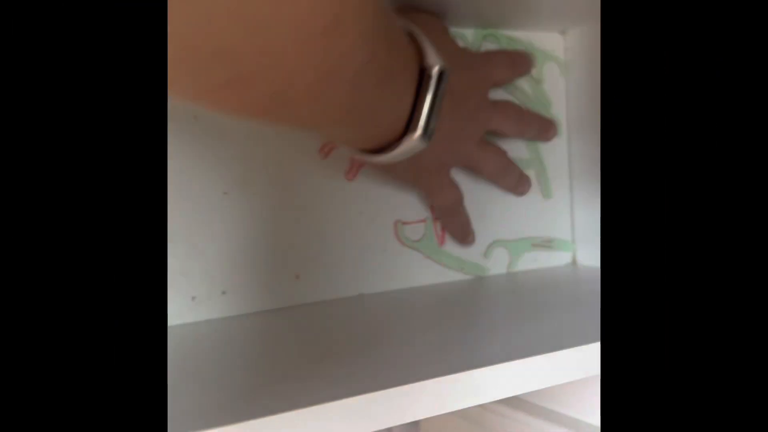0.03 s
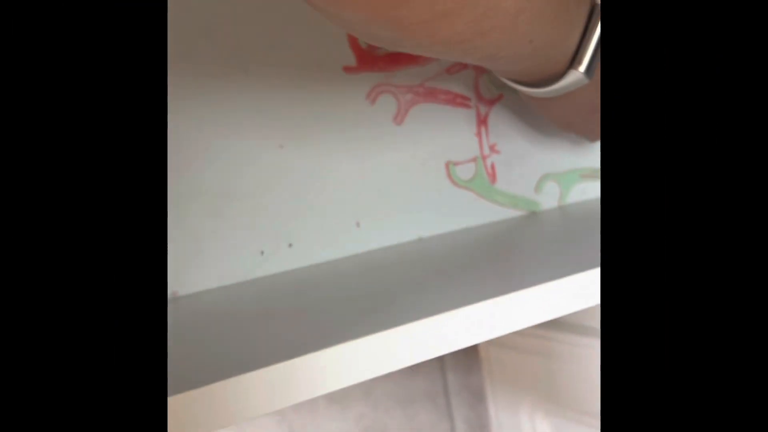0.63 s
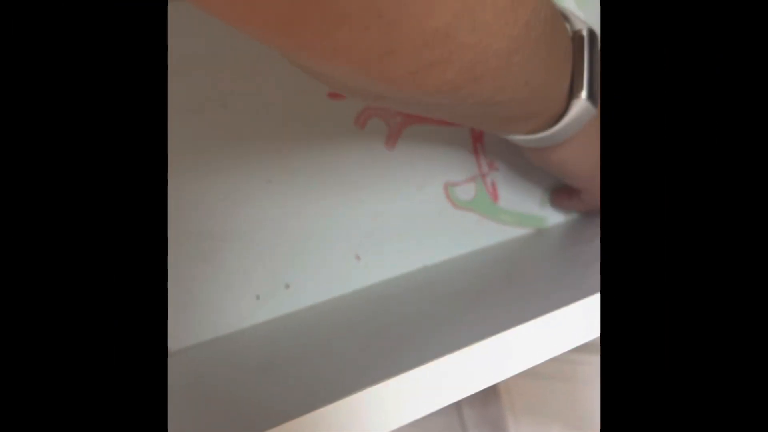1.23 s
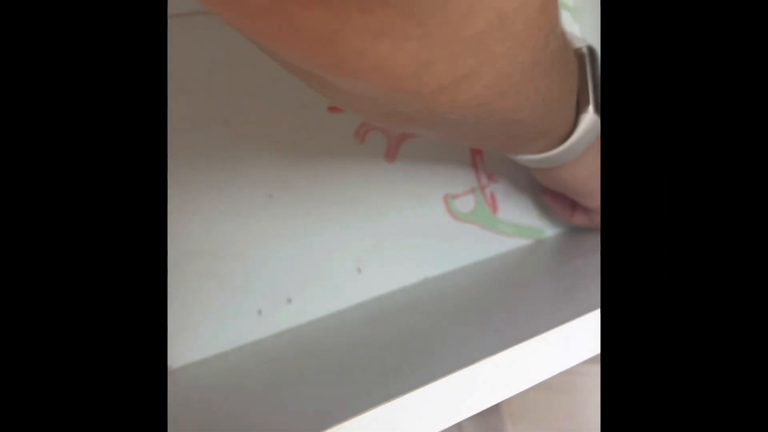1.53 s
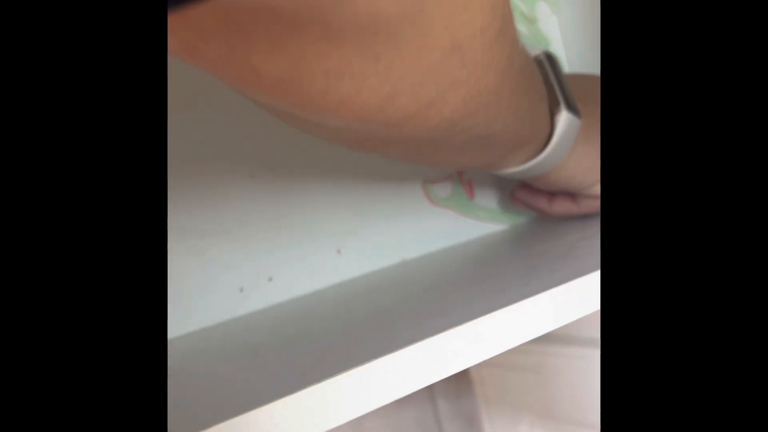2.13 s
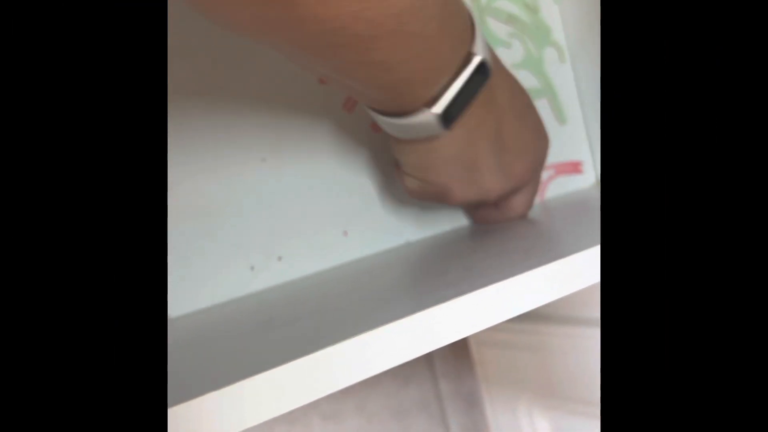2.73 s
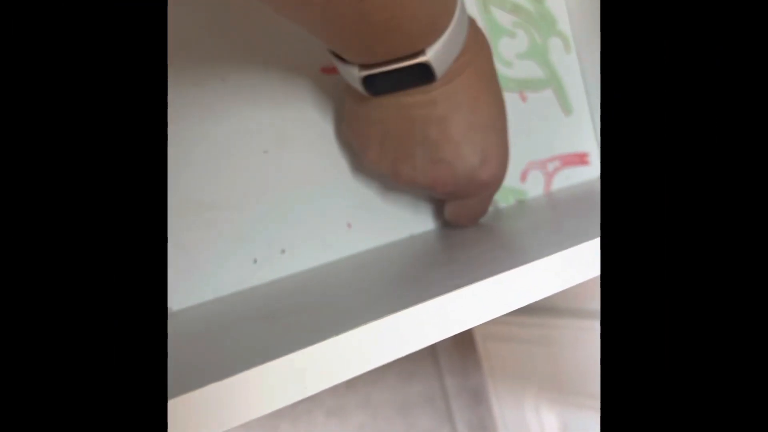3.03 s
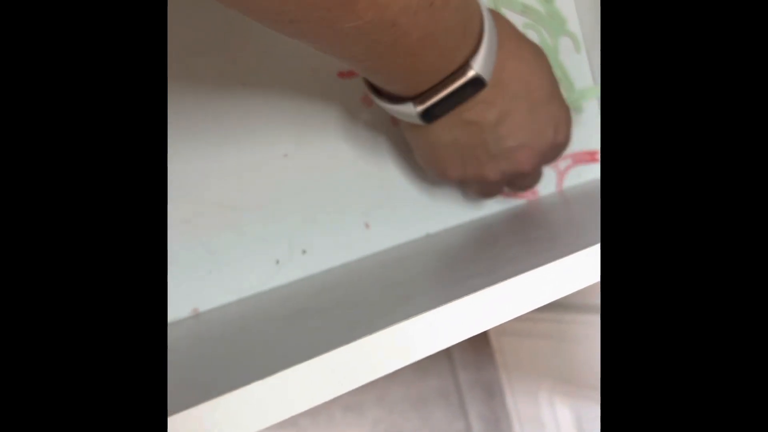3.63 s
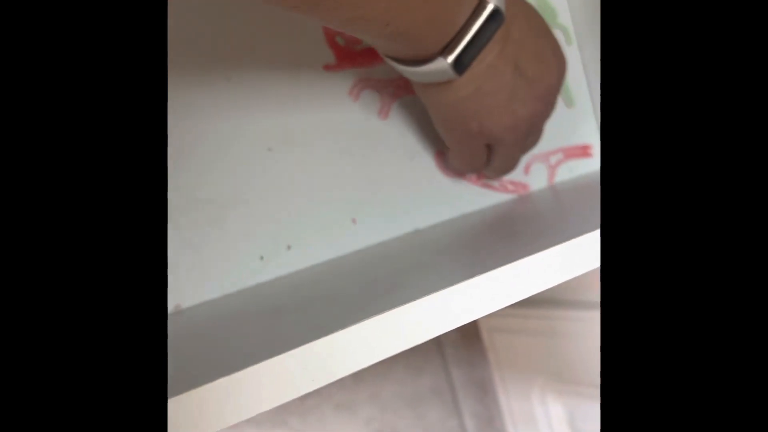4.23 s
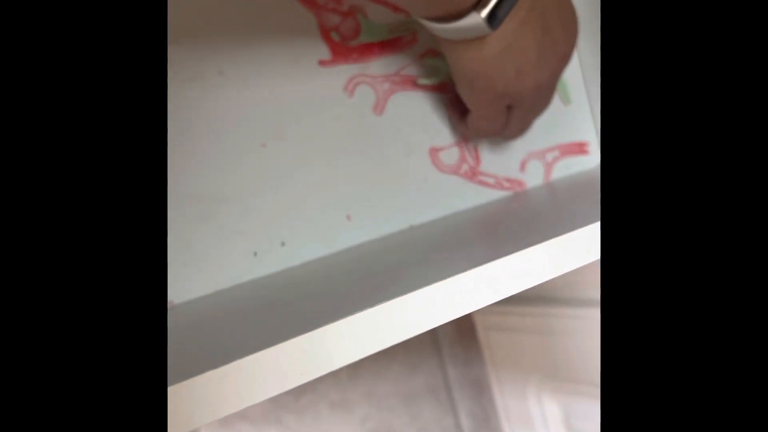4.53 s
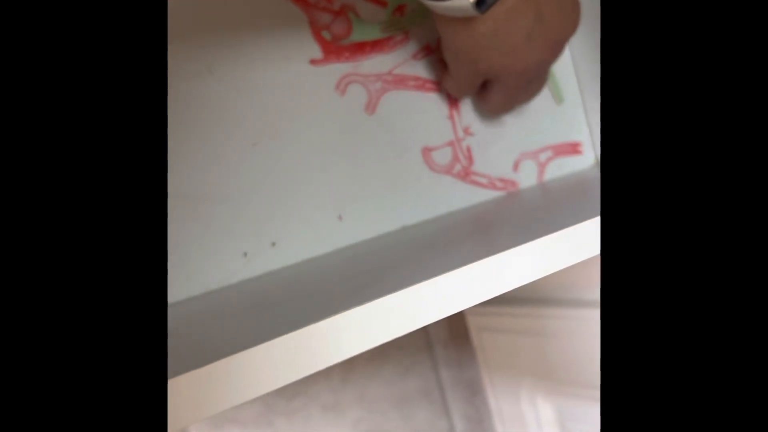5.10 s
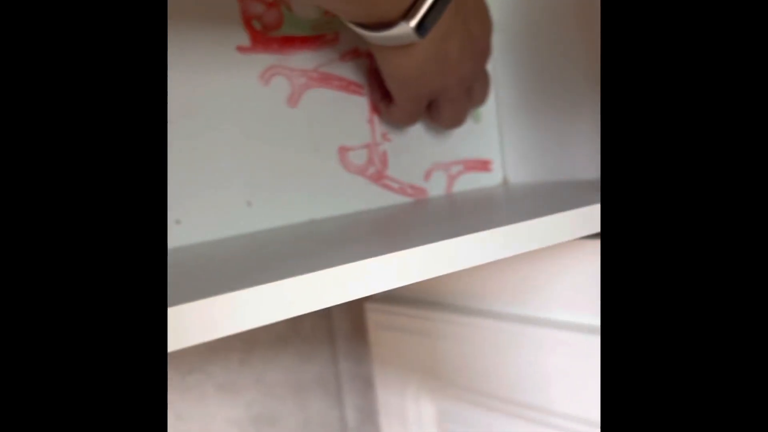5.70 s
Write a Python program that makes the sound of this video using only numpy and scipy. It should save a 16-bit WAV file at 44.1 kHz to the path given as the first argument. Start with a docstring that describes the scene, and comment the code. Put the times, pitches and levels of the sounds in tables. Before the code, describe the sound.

Close, irregular scraping and clattering of little plastic picks as a hand sweeps a cabinet shelf, knocking its hollow board.

```python
"""A hand rubs softly at small plastic picks spilled on a bathroom cabinet shelf, close to the microphone.
From about 1 s, nails and picks catch and snap harder, and knuckles bump the hollow shelf.
A heavy shove rocks the cabinet at 3.1 s, and at 3.4 s a dragging edge squeaks once.
The rubbing and clatter are busiest from 3.8 to 5.1 s, then thin out to a last bump near 5.9 s.
All along, the cabinet rings under the bumps and the tiled room adds a short echo."""
import sys
import numpy as np
from scipy import signal
from scipy.fft import rfft, irfft
from scipy.io import wavfile
from scipy.ndimage import uniform_filter1d

SR = 44100
rng = np.random.default_rng(int(sys.argv[2]) if len(sys.argv) > 2 else 0)


def output_pcm(signal):
    """Save a mono or channel-first signal as 16-bit PCM at the path in sys.argv[1].

    Samples are clipped to [-1, 1] before scaling.
    """
    pcm = np.clip(np.atleast_2d(signal).T, -1, 1) * 32767
    wavfile.write(sys.argv[1], SR, np.round(pcm).astype(np.int16))


N = 262836
T = np.arange(N) / SR

# Nails and picks snapping: start_s, level_db, hardness_db (low is dull, high is crisp), fade_s
SNAPS = [(0.215,-41.5,1,0.062), (0.5117,-35.5,-6.5,0.07), (0.802,-41.5,-7,0.048), (.964,-46.5,-18.5,0.14),
         (1.0057,-28.5,-9.5,0.052), (1.1228,-35.5,-6,0.047), (1.1322,-37,-1.5,0.12),
         (1.2043,-25.5,-5.5,0.042), (1.3627,-34,-6.5,0.058), (1.4277,-37,-6.5,0.054), (1.5456,-38,-8,0.15),
         (1.6564,-49.5,10.5,0.32), (1.694,-22,-1,0.05), (1.7666,-30.5,7,0.0084), (1.8068,-33,6.5,0.034),
         (1.8396,-30,9.5,0.045), (1.8599,-14.5,0.5,0.043), (2.142,-47.5,-16,0.12), (2.3047,-42,9,0.11),
         (2.4296,-12,6,.025), (2.44,-24,0.5,0.11), (2.9728,-33.5,-12,0.087), (3.097,-38.5,8.5,0.034),
         (3.1207,-15,7.5,0.076), (3.1278,-20,-0.5,0.038), (3.3003,-22,4.5,0.079), (3.345,-35.5,21,0.2),
         (3.368,-28,6,0.027), (3.4967,-29,17,0.022), (3.622,-46.5,10.5,0.024), (3.7547,-45.5,12,0.048),
         (3.7733,-38.5,-6,0.21), (3.8121,-11,2.5,0.013), (3.8182,-16,6.5,0.062), (3.8604,-25.5,7,0.061),
         (3.884,-29,10,0.035), (3.897,-24.5,1.5,0.054), (3.9083,-33,9,.07), (3.941,-21,6,0.099),
         (3.9952,-24,0,0.064), (4.0287,-17.5,-3.5,0.032), (4.207,-48.5,2,0.12), (4.2371,-35.5,13,0.032),
         (4.2554,-41.5,17,0.047), (4.3227,-18.5,0.5,0.038), (4.351,-12,2,0.06), (4.4354,-21,-11.5,0.064),
         (4.4545,-19,9,0.031), (4.5454,-31,-13.5,0.081), (4.6305,-25,3,0.063), (4.6726,-22.5,0,0.094),
         (4.683,-26.5,-10.5,0.025), (4.7235,-26,1.5,0.11), (4.799,-25,-1.5,0.05), (4.878,-16,-1,0.014),
         (4.8861,-12,0,0.026), (4.943,-25.5,-9.5,0.045), (4.9496,-31,6,0.095), (5.0408,-7.5,2.5,0.019),
         (5.0453,-11.5,-2.5,0.067), (5.3535,-44,-23,0.092), (5.686,-24,-2,0.04), (5.914,-33,3,0.069)]
# Bumps on the shelf: start_s, level_db, pitch_hz, knock_db, ring_db (the last two add to level_db)
BUMPS = [(0.22,-43,263,-7,11), (0.596,-46,255,-3,15.5), (1.011,-29,249,-25,8), (1.131,-28,258,-2.5,5),
         (1.207,-20,277,-3,7.5), (1.437,-32.5,275,-6,0), (1.548,-42,286,5,13), (1.698,-26.5,270,0,4),
         (1.75,-36,242,-17,13), (1.865,-16.5,264,-4.5,7), (2.416,-34.5,289,-9,13), (2.465,-18,260,-6,7),
         (2.589,-27.5,272,-24,-2), (2.876,-10.5,269.6,-14,-10), (2.976,-34,284,-7.5,21.5),
         (3.004,-18,250,-6,0.5), (3.127,-6.5,298.6,-22,0), (3.139,-7,265,-10,-5.5), (3.293,-26.5,312,-5,-4),
         (3.306,-25.5,250,-9,1), (3.638,-38.5,255,-12,6.5), (3.776,-24,309,-15.5,10),
         (3.789,-18,281,-8.5,11.5), (3.824,-20.5,261,-5,9), (4.031,-17,267,-5.5,-14),
         (4.328,-15,269,-20,-12.5), (4.358,-18,282,-8.5,5), (4.412,-19.5,263,-20,3),
         (4.444,-20.5,277,-13,-2), (4.458,-21,258,-21.5,-3), (4.55,-9,278.6,-5,2),
         (4.617,-19.5,264,-23.5,-3), (4.811,-17,257,-20.5,-4.5), (4.829,-10,262,-27.5,-1.5),
         (4.882,-14.5,268,-30,1.5), (5.015,-14,249,-12,-1), (5.055,-8,264,-15.5,-3.5),
         (5.103,-24,235,-9,-2), (5.521,-46,250.5,-21.5,13.5), (5.689,-33,286,-18,-1),
         (5.907,-16,263,-10.5,-28)]
# Shoves that rock the whole cabinet: start_s, level_db
SHOVES = [(1.21, -40), (1.866, -37.5), (2.878, -41), (3.136, -21), (3.163, -28), (4.357, -43),
          (4.443, -39.5), (4.552, -36.5), (5.052, -28)]
# Strokes of the hand: start_s, length_s, level_db, hardness_db (low is skin, high is nail or plastic)
STROKES = [(0,0.084,-48,4), (0.169,.09,-53.5,8.5), (0.419,.08,-51.5,4.5), (.51,0.11,-45.5,2),
           (.85,0.02,-52.5,-1.5), (1.01,0.053,-44,-2.5), (1.108,0.062,-44,-0.5), (1.22,0.052,-40.5,8.5),
           (1.318,0.056,-34,-1.5), (1.44,.17,-45,-2), (1.71,0.18,-65,28), (1.879,0.02,-29.5,-4),
           (1.98,0.098,-41,-0.5), (2.188,0.32,-45.5,4), (2.438,0.12,-33,1.5), (2.59,.13,-51,-8),
           (2.751,0.14,-43.5,-0.5), (2.91,.17,-40,-5), (3.1,0.056,-27,5), (3.269,0.15,-49.5,13.5),
           (3.409,0.053,-37.5,18), (3.519,0.21,-63,16.5), (3.84,0.14,-27,3.5), (3.98,0.14,-32,0.5),
           (4.2,0.046,-37,2), (4.361,0.16,-31.5,-4.5), (4.571,0.21,-28.5,-0.5), (4.811,0.087,-24,5.5),
           (4.972,.11,-22.5,3.5), (5.11,0.077,-41.5,1), (5.191,0.11,-41.5,-4.5), (5.32,0.096,-58.5,-12.5),
           (5.47,0.09,-47,-5), (5.71,0.12,-47,-2.5), (5.832,.13,-33,-1.5)]
# Rumble of the arm leaning on the cabinet: time_s, level_db
ARM_RUMBLE = [(0,-68.5), (.9,-74), (1.2,-49), (1.75,-60), (1.9,-52), (2.3,-65), (3.05,-48.5), (3.18,-41.5),
              (3.5,-67.5), (4,-56), (4.45,-49.5), (4.7,-57), (5.12,-40), (5.4,-73), (5.96,-62)]
# Short scrapes: middle_s, half_length_s, level_db, brightest_hz
SCRAPES = [(0.024,0.05,-65,1690), (0.259,0.018,-50,1510), (0.588,0.015,-59,1180), (1.259,0.0061,-48,2900),
           (1.698,0.0092,-31,8700), (2.068,0.023,-48.5,3080), (2.432,0.0039,-25,3100),
           (2.446,0.0076,-30,2980), (2.549,0.019,-44,2430), (2.825,0.057,-56.5,9600),
           (2.982,0.022,-48.5,1910), (3.121,0.004,-24.5,2230), (3.307,0.014,-33.5,1600),
           (3.368,0.018,-38.5,3060), (3.448,0.033,-40.5,2490), (4.108,0.013,-46.5,3360),
           (4.88,0.0059,-24,4270), (4.993,0.022,-42,2600), (5.043,0.0056,-22.5,6000),
           (5.841,0.02,-43.5,1300), (5.915,0.013,-43,4560)]
# Light fingertip taps: start_s, level_db, pitch_hz
TAPS = [(.803, -43, 1663), (.9645, -36.5, 900), (1.006, -30, 1350), (2.143, -38.5, 974),
        (4.437, -16.5, 883)]
# The course of the squeak: time_s, pitch_hz, level_db
SQUEAK = [(3.405, 820, -60), (3.416, 880, -43), (3.428, 970, -37), (3.440, 940, -41), (3.450, 890, -39),
          (3.461, 790, -39), (3.472, 765, -38), (3.488, 750, -60)]
# Pitches that the shelf board favours: pitch_hz, width_hz, boost_db
BOARD_PEAKS = [(486.6, 20, 6), (778, 110, 6), (991.5, 17, 9.5), (1262, 176, 9.5), (1633, 33, 10),
               (1937, 270, 6.5), (2063, 49, 6), (2416, 86, 7.5), (3060, 430, 3.5), (5920, 27, -1.5),
               (6240, 880, 0.5), (11170, 340, 5)]
# Notes of the hollow cabinet: pitch_hz, level_db, fade_s (every fade_s is the time to fall by 60 dB)
CABINET_NOTES = [(68.1, 0.5, 0.37), (137.4, 0, 0.067), (170.6, -16.5, 0.39), (235.3, -0.5, 0.15),
                 (270.1, -3.5, 0.2), (322.8, -5.5, 0.26), (486.2, -0.5, 0.22)]
# Echo of the tiled room: low_hz, high_hz, fade_s, level_db
ROOM_ECHO = [(99.6, 790, 0.54, -19.5), (626, 1840, 0.37, -16), (2380, 8600, 0.29, -14),
             (7000, 7800, 0.21, -29.5)]

# Tone curves, which say how strong a sound is from bass to treble: frequency_hz, level_db
CLACK_TONE = [(150, -45), (400, 11), (600, 5), (1300, 0), (2000, 1), (3000, -48), (6000, -42)]  # a pick clacking on the board
SNAP_TONE = [(900, -1.5), (1700, 8.5), (2400, 4), (3500, 0.5), (4700, 0.5), (6500, 4), (8500, -1.5),
             (14000, -21)]  # the snap of the pick itself
CRISP_TONE = [(3000, -19.5), (5500, 4.5), (7500, 5), (10000, 4), (13000, 0), (16000, -9.5)]  # a hard edge ticking
DRUM_TONE = [(60, -50.5), (170, -24), (230, 1.5), (280, 2), (330, -3.5), (400, -22.5), (520, -12),
             (900, -57.5)]  # skin drumming the board
RASP_TONE = [(200, -31), (450, -11), (800, 4), (1400, -7.5), (2400, -7.5), (3500, -20), (5000, -29),
             (10000, -51.5)]  # the rough middle of a rub
HISS_TONE = [(1500, -7.5), (3500, 12.5), (4700, 8), (6500, 11), (9000, 8), (12000, 1.5), (16000, 4.5)]  # nails and plastic sliding
RUMBLE_TONE = [(20, -51.5), (40, -12), (67, 2), (95, -8.5), (140, -4.5), (200, -13), (500, -56)]  # the leaning arm
SQUEAK_TONE = [(300, -16), (750, -7), (2200, -4), (3000, -4), (7000, -10)]  # the squeaking board
AIR_TONE = [(25, -30.5), (60, 5), (100, -12), (260, -9), (500, -21), (2000, -31.5), (6000, -39.5),
            (16000, -57.5)]  # still room air
SIDE_TONE = [(60, -23), (260, -23), (600, -9), (1300, -8), (2400, -18.5), (4400, -1.5), (8000, -13.5),
             (15000, 1.5)]  # how much stereo width is kept
LEFT_MIC_TONE = [(350, -1.6), (700, 1.0), (1300, -0.26), (2200, -0.26)]  # a little louder near 700 Hz
RIGHT_MIC_TONE = [(350, -1.28), (700, -1.8), (1300, -0.22), (2200, -0.27)]


def snaps(drag_db=-23, drag_s=0.002, crack_db=3, crack_s=0.00029, piece_width_hz=220, piece_boost_db=4.5):
    """A pick drags for an instant, lets go with a crack and rattles on the board at its own pitches."""
    t = T[:SR // 6] - 0.02  # the pick lets go at t = 0
    after = np.maximum(t, 0)
    drag = undb(drag_db) * np.exp(-np.abs(t) / drag_s)
    crack = undb(crack_db) * np.exp(-after / crack_s)
    out, slips = np.zeros((2, N)), tiny_slips(14000, 4.55)
    piece_pitches = 400 + np.cumsum(rng.uniform(500, 1800, (len(SNAPS), 12)), axis=1)
    for (start_s, db, hardness, fade_s), pitches in zip(SNAPS, piece_pitches):
        rise_s = 0.0012 * (fade_s / 0.05) ** 0.36  # a long rattle builds up more slowly
        onset = 1 - np.exp(-(after / rise_s) ** 2)
        rattle = undb(db) * np.take(slips, int(start_s * SR) + np.arange(len(t)), axis=1, mode="wrap")
        peaks = list(BOARD_PEAKS) + [(hz, piece_width_hz, piece_boost_db) for hz in pitches]
        # A harder contact has less clack and more crisp edge, which dies first.
        shares = undb([-hardness, 2, hardness - 4])
        shares /= np.linalg.norm(shares)
        for share, tone, stretch in zip(shares, (CLACK_TONE, SNAP_TONE, CRISP_TONE), (1.09, 1, 0.74)):
            release = onset * (undb(-60 * after / (fade_s * stretch)) + crack)
            add(out, start_s - 0.0005 + t[0], share * colour((release + drag) * rattle, tone, peaks))
    return out


def bumps(rise_s=0.0084, knock_ratio=1.695, lead_s=0.00325, shove_hz=122, shove_s=0.006):
    """Knuckles and shoves shake the shelf. Gives the thuds and the sound that the hand lets ring on."""
    t, out = T[:SR // 12], np.zeros((2, N))
    for start_s, db, hz, knock_db, ring_db in BUMPS:
        thud = undb(1) * shelf_swing(t, hz, rise_s)
        knock = undb(knock_db) * shelf_swing(t, hz * knock_ratio, rise_s * 0.35)
        add(out, start_s - lead_s, (thud + knock) * undb([db, db + ring_db])[:, None])
    shove = t / shove_s * np.exp(1 - t / shove_s) * np.sin(2 * np.pi * shove_hz * t)
    for start_s, db in SHOVES:
        add(out, start_s, undb(db - 2) * shove)
    return out


def shelf_swing(t, hz, rise_s, sag=0.015):
    """The shelf swings a few times under a soft blow; its pitch sags as the hand presses on it."""
    age = t / rise_s
    pitch_hz = hz * (1 + sag * np.tanh(1 - age))
    return age ** 2 * np.exp(1 - age ** 2) * np.sin(2 * np.pi * np.cumsum(pitch_hz) / SR)


def rubbing(drum_db=-5, rasp_db=-17, hiss_db=-25, tick_db=-30, grip_spread_db=3.5):
    """Skin and nails slip over the board as the grip wavers; the arm rumbles and loose picks tick."""
    drum, rasp, hiss = sum(undb([db - hardness, db, db + hardness])[:, None] * stroke(start_s, length_s)
                           for start_s, length_s, db, hardness in STROKES)
    arm_db, = curves(ARM_RUMBLE)
    grip_db = grip_spread_db * wander(110)
    slips = tiny_slips(3300, 1.9)
    out = colour(drum * undb(drum_db + grip_db / 2) * tiny_slips(900, 1.9), DRUM_TONE, BOARD_PEAKS)
    out += colour(rasp * undb(rasp_db + grip_db) * slips, RASP_TONE, BOARD_PEAKS)
    fine_slips = unit_level(slips + 2.5 * tiny_slips(16000, 1.4))
    out += colour(hiss * undb(hiss_db + grip_db) * fine_slips, HISS_TONE, BOARD_PEAKS)
    out += colour(undb(arm_db) * rng.standard_normal((2, N)), RUMBLE_TONE)
    return out + colour(hiss * undb(tick_db) * tiny_slips(120, 1.8), SNAP_TONE, BOARD_PEAKS)


def stroke(start_s, length_s, rise_s=0.011, ease_s=0.028):
    """The hand gets moving, keeps its pace and eases off."""
    return np.clip((T - start_s) / rise_s, 0, 1) * np.exp(-np.maximum(T - start_s - length_s, 0) / ease_s)


def scrapes():
    """A nail or a pick drags a short way: a spray of tiny slips swells and fades."""
    out, slips = np.zeros((2, N)), tiny_slips(6000, 2.2)
    for middle_s, half_s, db, hz in SCRAPES:
        first = max(int((middle_s - 3 * half_s) * SR), 0)
        last = int((middle_s + 3 * half_s) * SR)
        swell = undb(db) * np.exp(-((T[first:last] - middle_s) / half_s) ** 2)
        tone = [(hz / 8, -30), (hz / 2, -9), (hz, 0), (hz * 2, -9), (hz * 8, -30)]
        add(out, first / SR, colour(slips[:, first:last] * swell, tone, BOARD_PEAKS))
    return out


def taps(fade_s=0.056, rise_s=0.0014):
    """A fingertip lands on the board, which answers with one short note."""
    t, out = T[:SR // 10], np.zeros(N)
    for start_s, db, hz in TAPS:
        loudness = undb(db - 60 * t / fade_s) * (1 - np.exp(-t / rise_s))
        add(out, start_s, loudness * np.sin(2 * np.pi * hz * t))
    return out


def squeak(pitch_wobble=0.014, rough_db=3.5):
    """An edge sticks and slips so evenly for a moment that the board sounds a note."""
    hz, db = curves(SQUEAK)
    phase = 2 * np.pi * np.cumsum(hz * (1 + pitch_wobble * wander(900))) / SR
    buzz = unit_level(sum(np.sin(k * phase) / k for k in range(1, 10)))
    sounding = (T > SQUEAK[0][0]) & (T < SQUEAK[-1][0])
    loudness = sounding * undb(db + rough_db * wander(300))
    return apply_filter(buzz * loudness, tone_filter(SQUEAK_TONE, BOARD_PEAKS))[0]


def cabinet(sound, ring_db=-2):
    """The hollow box adds its own ringing notes to whatever shakes it."""
    t, ring = T[:SR // 2], 0
    for hz, db, fade_s in CABINET_NOTES:
        balance = 2 * np.log(1000) / (fade_s * SR)  # keeps a long note from building up louder
        ring += balance * undb(db - 60 * t / fade_s) * np.cos(2 * np.pi * hz * t)
    return sound + undb(ring_db) * apply_filter(sound, ring)


def bathroom(sound, gap_s=0.0049, build_s=0.0058):
    """Sound bounces off the tiles and blurs into a short echo whose treble dies first."""
    t, echo = T[:SR], 0
    onset = 1 - np.exp(-np.maximum(t - gap_s, 0) / build_s)
    for low_hz, high_hz, fade_s, db in ROOM_ECHO:
        shape = onset * undb(-60 * t / fade_s)
        band = signal.butter(2, [low_hz, high_hz], "band", fs=SR, output="sos")
        noise = signal.sosfilt(band, rng.standard_normal((2, len(t))))
        echo += undb(db) * noise * shape / np.linalg.norm(shape)
    return apply_filter(sound, echo)


def room_air(level_db=-65):
    """The still room makes a faint, low hush."""
    return undb(level_db) * colour(rng.standard_normal((2, N)), AIR_TONE)


def tiny_slips(per_second, spread_db):
    """Clicks at random moments, many small and a few large, in two rows: mid and side."""
    happens = rng.random(N) < per_second / SR
    size = undb(spread_db * np.minimum(rng.exponential(size=N), 4))  # the grip limits the size
    return unit_level(happens * size * rng.choice([-1, 1], (2, N)))


def wander(rate_hz):
    """A smooth random drift, about 1 in size."""
    step = int(SR / rate_hz)
    stairs = np.repeat(rng.standard_normal(N // step + 1), step)
    return unit_level(uniform_filter1d(stairs, step))[:N]


def tone_filter(tone, peaks=(), size=4096):
    """Build a filter from a tone curve and any ringing peaks on top of it."""
    grid_hz = np.maximum(np.fft.rfftfreq(size, 1 / SR), 1)
    hz, db = np.transpose(tone)
    curve_db = np.interp(np.log(grid_hz), np.log(hz), db)
    peaks_db = sum(boost / (1 + (2 * (grid_hz - pitch) / width) ** 2) for pitch, width, boost in peaks)
    # Folding the second half onto the first makes the filter ring only after a hit.
    folded = irfft(np.log(undb(curve_db + peaks_db)))
    folded[1:size // 2] *= 2
    folded[size // 2 + 1:] = 0
    return irfft(np.exp(rfft(folded)))[:size // 2]


def colour(noise, tone, peaks=()):
    """Give plain noise a tone while keeping its power."""
    response = tone_filter(tone, peaks)
    return apply_filter(noise, response / np.linalg.norm(response))


def apply_filter(sound, response):
    """Pass each row of a sound through a filter or an echo."""
    return signal.fftconvolve(np.atleast_2d(sound), np.atleast_2d(response), axes=-1)[:, :N]


def curves(table):
    """Join the rows of a table with straight lines in time."""
    time_s, *columns = np.transpose(table)
    return [np.interp(T, time_s, column) for column in columns]


def add(track, start_s, sound):
    """Mix a sound into a track at a given time."""
    first = max(int(start_s * SR), 0)
    track[..., first:first + sound.shape[-1]] += sound[..., :N - first]


def undb(db):
    """Turn decibels into a number to multiply by."""
    return 10 ** (np.asarray(db) / 20)


def unit_level(sound):
    """Scale a sound to an average power of 1."""
    return sound / np.sqrt(np.mean(sound ** 2))


def scene(echo_side_db=4, bump_ring_db=2):
    """The hand sounds through cabinet and room. Row 0 (mid) is the centre; row 1 (side) adds width."""
    thuds, ringing = bumps()
    ringing = undb(bump_ring_db) * ringing
    near = snaps() + scrapes() + rubbing()
    near[0] += ringing + squeak() + taps()
    near = cabinet(near)
    echo = bathroom(near[0]) * undb([0, echo_side_db])[:, None]
    near[0] += thuds - ringing  # the part of a bump that the hand muffles is heard only directly
    mid, side = near + echo + room_air()
    side = apply_filter(side, tone_filter(SIDE_TONE))[0]
    left = apply_filter(mid + side, tone_filter(LEFT_MIC_TONE))[0]
    right = apply_filter(mid - side, tone_filter(RIGHT_MIC_TONE))[0]
    return np.array([left, right])


def record(dry):
    """The recorder rounds off the loudest peaks and cuts the highest treble."""
    treble_cut = signal.ellip(10, 0.2, 80, 16100, fs=SR, output="sos")
    return signal.sosfilt(treble_cut, np.tanh(0.83 * dry) / 0.75)


dry = scene()
out = record(dry)
output_pcm(out)
```